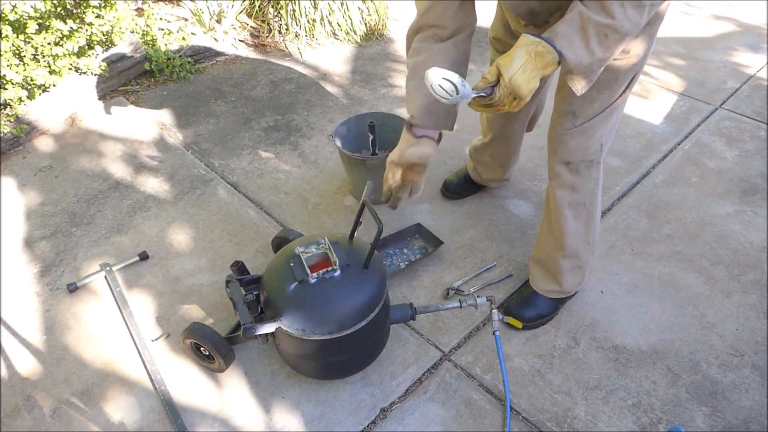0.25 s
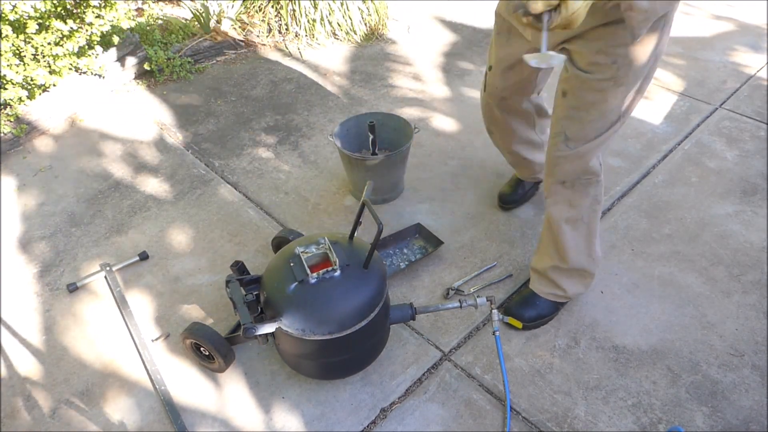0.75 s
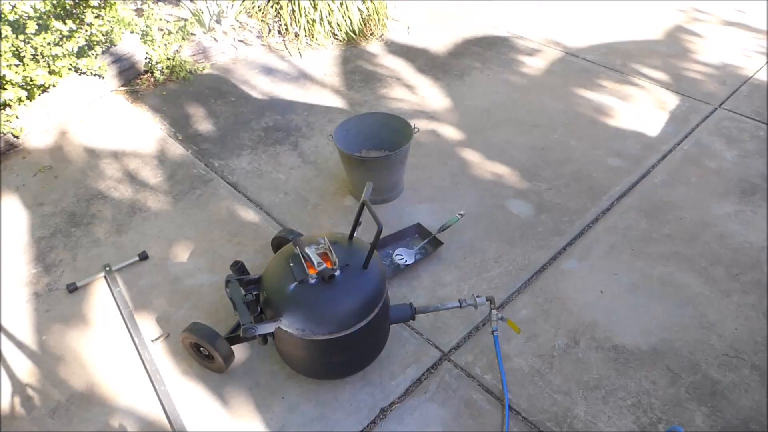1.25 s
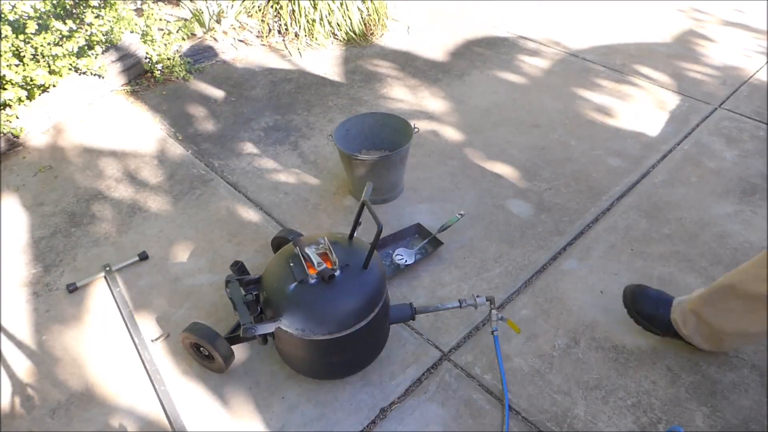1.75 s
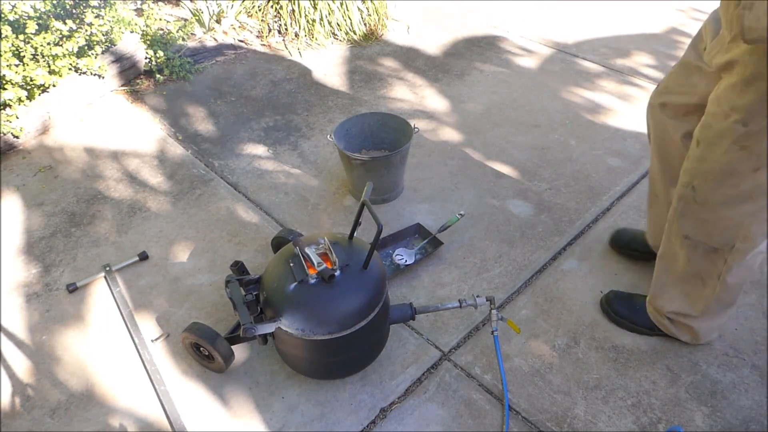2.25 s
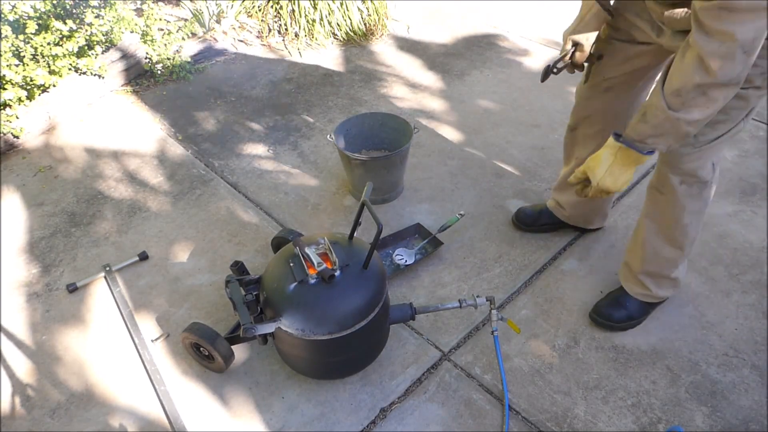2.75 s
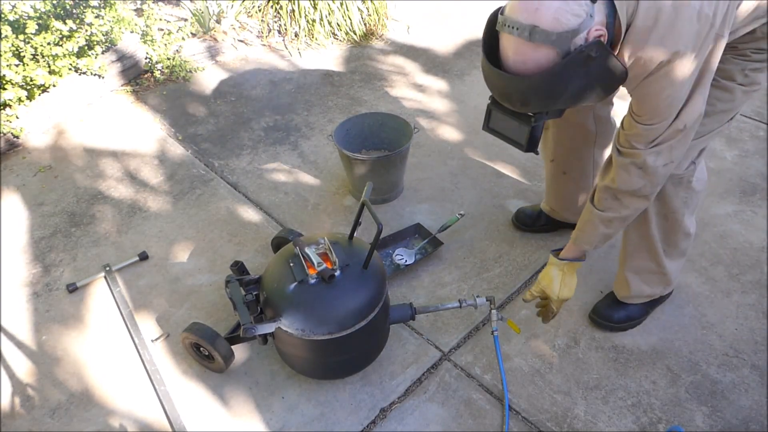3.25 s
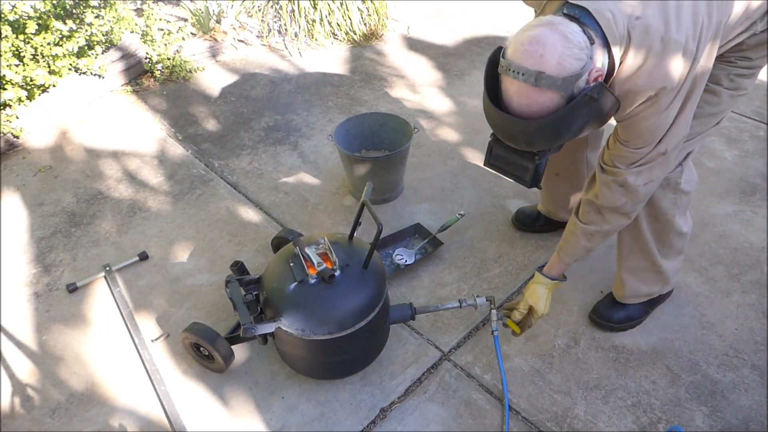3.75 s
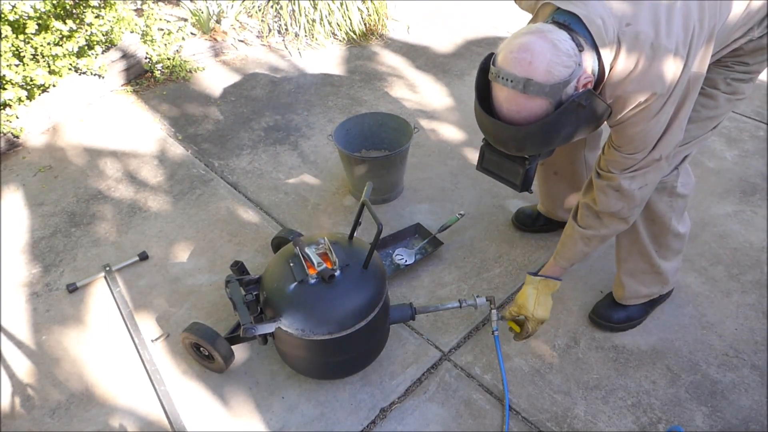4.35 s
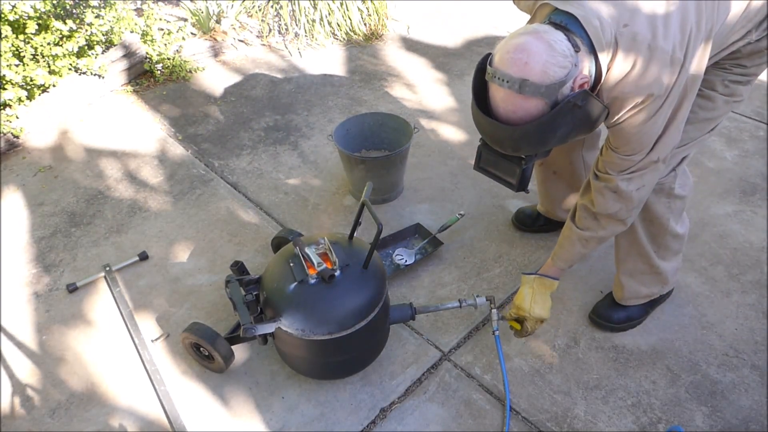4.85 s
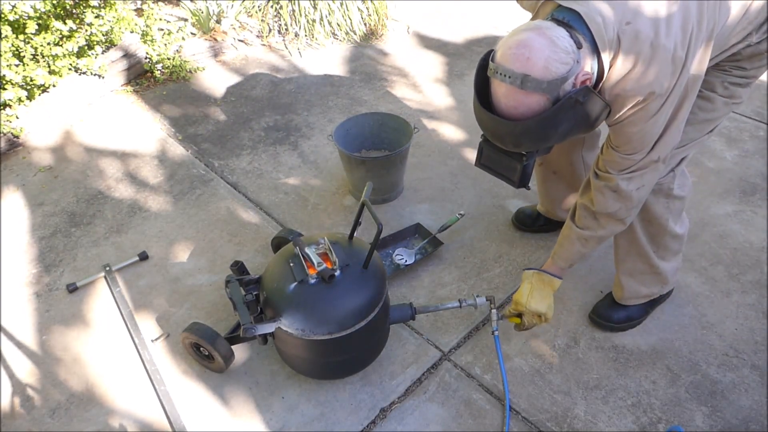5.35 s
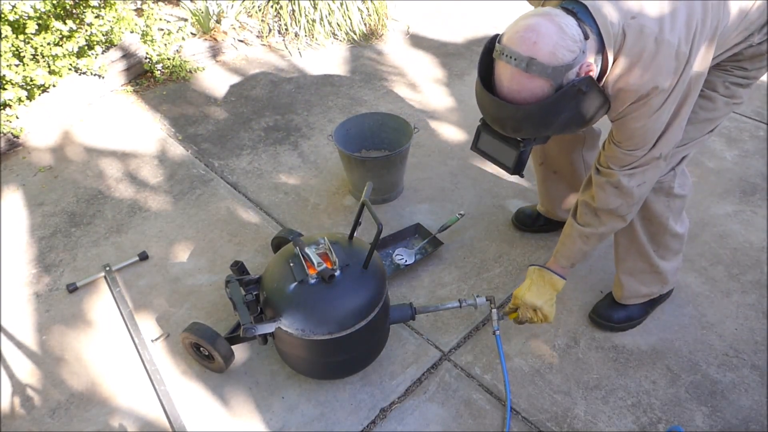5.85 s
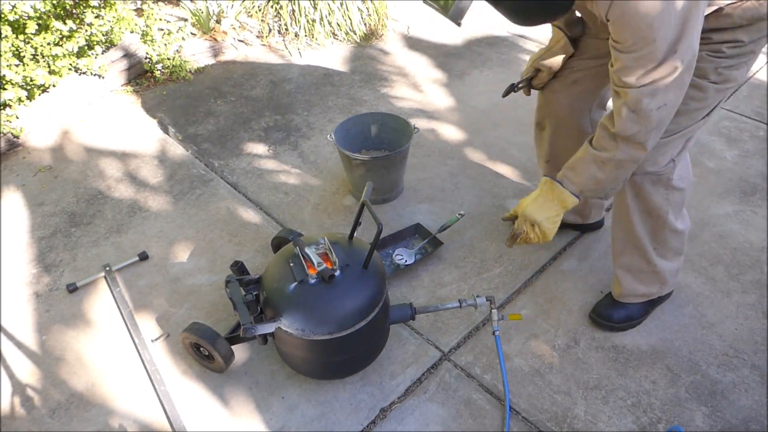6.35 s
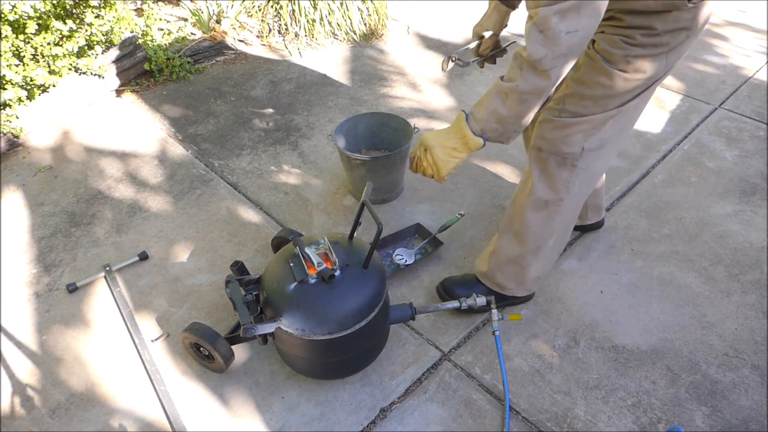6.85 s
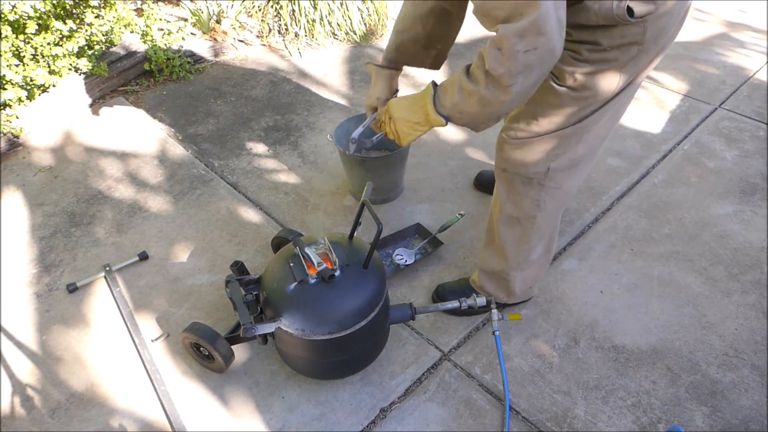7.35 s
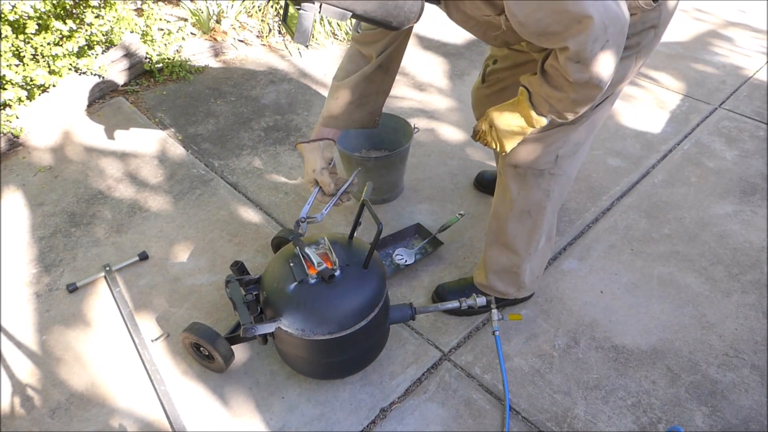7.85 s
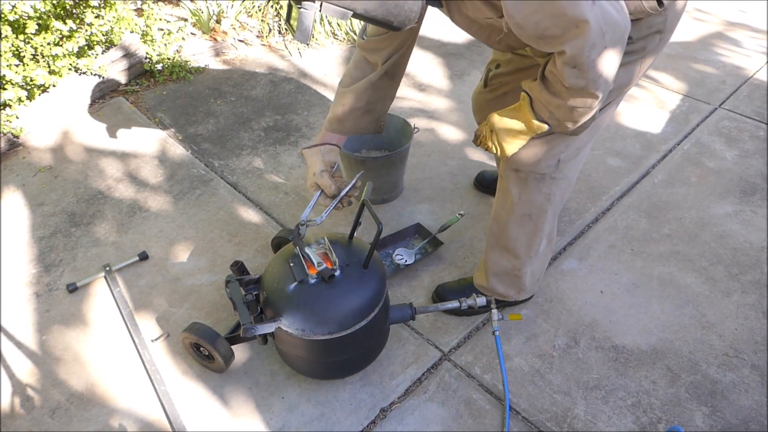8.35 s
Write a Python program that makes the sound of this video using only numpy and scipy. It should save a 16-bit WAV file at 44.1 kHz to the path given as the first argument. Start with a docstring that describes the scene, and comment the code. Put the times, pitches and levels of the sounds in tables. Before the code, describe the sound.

In an outdoor yard, a nearby gas furnace burns with a deep, even roar, a ringing tube tone and a bright hiss, broken once by a split-second dropout. Past the middle the flame fades out as the valve closes, uncovering soft leaf rustle, far traffic and a faint raspy, birdlike squeal. Several boot steps cross the concrete among very faint whistles, and steel tongs give two bright clinks at the end.

```python
"""Gas furnace in a concrete yard

A gas burner roars into a small steel furnace: the chamber booms, the tube rings, the jet hisses.
The sound drops out once, then the valve is shut. A rough, distant squeal echoes, perhaps a bird.
Boots knock on the slabs, tongs tick and clink, and faint whistles pass over far traffic and leaves."""
import sys
import numpy as np
from scipy import signal
from scipy.fft import rfft, irfft, next_fast_len
from scipy.io import wavfile
from scipy.ndimage import uniform_filter1d, map_coordinates

SR = 44100
rng = np.random.default_rng(int(sys.argv[2]) if len(sys.argv) > 2 else 0)


def transcribe(u):
    """Save the signal u as a 16-bit wav file named by the first command-line argument.

    u: samples, shape (n,) or (channels, n), limited to [-1, 1]; the rate is SR.
    q: integer samples, one column per channel.
    """
    v = np.clip(np.atleast_2d(u).T, -1, 1)
    q = np.round(v * 32767).astype(np.int16)
    wavfile.write(sys.argv[1], SR, q)


N = 379260
T = np.arange(N) / SR
GRID_HZ = np.arange(0, SR / 2, 3.0)
SHUT_S, OUT_S = 5.326, 5.9  # the valve starts to close; the flame is out

# The dropout that splits the burn in two: start_s, end_s
GAP = (1.2805, 1.3705)
# Resonances of chamber, burner tube and gas jet: pitch_hz, width_hz, before_gap_db, after_gap_db
CHAMBER_MODES = [(85, 14, -25, -28), (137, 21, -12, -12.5), (168, 41, -3.5, -6.5), (214.7, 39.4, 1.5, -1),
                 (288.2, 29.4, -5.5, -1), (333.5, 44, -3.5, 2), (391, 84, -8.5, -5.5),
                 (462.7, 50, -10.5, -10), (543, 51, -14.5, -14), (618.6, 65, -19, -17)]
TUBE_MODES = [(791, 54, 0, -4), (978, 63, -8, -11), (1162, 77, -5, -11), (1395, 60, 3, -1),
              (1463, 42, 1, 0), (1543, 41, -1.5, -1.5), (1732, 59, -2, -4.5), (1950, 120, -6, -9),
              (2100, 56, -1, -9), (2317, 240, -12.5, -11.5), (2510, 42, -8.5, -10), (2583, 50, -1.5, -1.5),
              (2770, 61, -4, -5.5), (2957, 136, -8, -11), (3176, 70, -12.5, -13), (3324, 90, -9.5, -15.5)]
JET_MODES = [(3805, 470, 0.5, 0.5), (4400, 520, -0.5, -0.5), (5300, 500, -8, -8.5), (5960, 570, -6, -3.5),
             (6520, 55, -5, -1), (6687, 126, -0.5, 1.5), (7190, 220, -8, -9), (7840, 220, -9, -7.5),
             (8440, 120, -7, -6.5), (8730, 200, -13, -11.5), (9300, 500, -17, -17), (10000, 540, -7, -5.5),
             (10970, 740, -9.5, -8), (11730, 350, -8, -6.5)]
# Faders for chamber, tube and jet; the loss is reached 0.1 s into the closing:
# before_gap_db, after_gap_db, creep_db_per_s, loss_db, fade_exponent
FLAME_FADERS = [(-18.5, -18, 0, 10, 1.13), (-32, -33, 0, 7, 1.75), (-42.5, -36.5, 0.42, 15.5, 1.23)]
# Brief swells and dips, a list each for chamber, tube and jet: centre_s, width_s, gain_db
FLAME_SWINGS = [
    [(.19, 0.046, -5), (5.31, .04, 2)],
    [(3.1, 0.36, -1.5)],
    [(.7, .04, 3), (.82, .04, 2.5)],
]
# Stereo image of the burner's direct sound: frequency_hz, correlation
BURNER_IMAGE = [(60, 0.47), (130, 1), (500, 0.98), (1200, 0.99), (2600, 0.96), (5500, 0.94), (11700, 0.57)]
# Balance of tube and jet: frequency_hz, left_minus_right_db
BURNER_BALANCE = [(60, 0), (170, -2), (500, 1), (1420, 0.5), (4080, -1), (11700, 1.5)]
# Faders for the background bed: time_s, traffic_db, leaves_db
AIR_FADERS = [(5.8, -51.5, -59), (5.99, -54, -60.5), (6.14, -53, -56.5), (6.83, -50, -56), (7.2, -51, -58),
              (7.6, -51.5, -53.5), (7.88, -54.5, -59), (8.09, -55, -61), (8.45, -52.5, -61.5),
              (8.6, -49, -60)]
# Tone curves of traffic and leaves: frequency_hz, gain_db
TRAFFIC_EQ = [(15, -54), (25, -22), (101, -15), (133, -5), (368, -11), (419, -10), (551, -13), (897, -18.5),
              (1200, -21.5), (1560, -56), (2640, -120)]
LEAVES_EQ = [(470, -25), (800, -6), (906, -9), (1110, -7), (1940, -9.5), (2190, -10.5), (3120, -13),
             (4090, -16), (6080, -16), (7460, -19.5), (11000, -17), (12100, -21.5), (22000, -120)]
# Stereo image of the bed: frequency_hz, correlation
AIR_IMAGE = [(60, -0.41), (220, -0.12), (840, -0.26), (3140, 0.32), (11700, 0.29)]
# Dry ticks: start_s, level_db, centre_hz, t60_s
TICKS = [(.121, -19, 4100, 0.051), (0.143, -30, 3500, 0.053), (.161, -46, 4500, .03),
         (.171, -36, 4000, 0.021), (5.708, -50, 1490, .06), (5.84, -38, 100, 0.11),
         (6.061, -41.5, 2300, 0.032), (6.077, -51, 2400, .03), (6.59, -55, 2000, 0.11)]
# Decay of the yard's reverb: frequency_hz, t60_s
YARD_DECAY = [(200, 0.26), (2000, 0.24), (10000, 0.22)]
# The distant squeal's two gliding voices, a list each: time_s, pitch_hz, level_db, roughness (0-1)
SQUEALS = [
    [(5.625, 3220, -56.5, 0.3), (5.68, 2930, -48, .5), (5.72, 3024, -51, .8), (5.79, 3550, -51, .7),
     (5.83, 4060, -55, .2), (5.93, 4086, -66, 0.2), (6.07, 4100, -67, .1)],
    [(5.68, 3530, -62, .8), (5.76, 3400, -57, 0.58), (5.85, 3490, -55, 0.8), (5.99, 3530, -68, .9)],
]
# The octave above each voice: peak_gain_db, peak_s, width_s
SQUEAL_OCTAVES = [(-26, 5.75, .3), (-3.5, 5.74, 0.064)]
# Footsteps: start_s, level_db, scuff_gain_db, left_minus_right_db
STEPS = [(6.333, -49, -23, -1.0), (6.719, -42, -16, -3), (6.976, -31, -23, -1), (7.063, -37, -20, 0.0),
         (7.31, -44.5, -24, -3), (7.454, -20, -25.5, -1), (7.581, -43, -26, 4.0), (7.888, -56, -15, 2.5)]
# Modes of a slab under a boot: pitch_hz, gain_db, t60_s
SLAB_MODES = [(253, -2.5, 0.035), (408, 4, 0.034), (550, 2, 0.041), (672, 6, 0.028), (830, -10, 0.02),
              (1150, -13, 0.023)]
# Faint whistles: start_s, end_s, start_hz, end_hz, level_db, flutter_hz, left_minus_right_db
WHISTLES = [(6.445, 6.92, 647, 623, -62.5, 59, 0), (6.704, 7.0, 1100, 1100, -61, 110, 0),
            (6.77, 6.96, 2900, 2890, -69, 40, 0), (7.12, 7.423, 185, 180.4, -56.5, 18, -2),
            (7.2, 7.268, 2720, 2700, -64, 40, 2), (7.238, 7.413, 2570, 2430, -65, 270, 0),
            (7.97, 8.08, 3200, 3220, -75, 96, -6)]
# Tongs hitting steel: start_s, level_db, crack_gain_db, shell_gain_db, left_minus_right_db
CLINKS = [(8.4015, -35, -6.5, -3, 2.5), (8.575, -22, -18.5, -17, 2.5)]
# Modes of the tongs: pitch_hz, gain_db, t60_s
TONG_MODES = [(1350, -8, .05), (2340, -7, .04), (4810, -7, .22), (4870, -5.5, 0.18), (4970, 2.5, .04),
              (9800, -21, .04)]

HIT_T = np.arange(SR // 2) / SR  # seconds since a hit


def amp(db):
    """Decibels to gain."""
    return 10 ** (np.asarray(db) / 20)


def unit(x):
    """Scale to rms 1."""
    return x / np.sqrt(np.mean(x ** 2) + 1e-20)


def along(points, hz):
    """Read a curve of (frequency_hz, value) points on a log axis."""
    f, values = np.transpose(points)
    return np.interp(np.log(hz + 1), np.log(f + 1), values)


def automation(rows):
    """One value per sample for each column after the time."""
    times, *columns = np.transpose(rows)
    return [np.interp(T, times, column) for column in columns]


def wobble(rate_hz, count=N):
    """A smooth random curve with rate_hz knots a second."""
    knots = rng.standard_normal(int(count * rate_hz / SR) + 4)
    return map_coordinates(knots, [T[:count] * rate_hz], order=2)


def filtered(x, response):
    """EQ x with a gain that is a function of frequency."""
    size = next_fast_len(x.shape[-1] + 8192)
    return irfft(rfft(x, size) * response(np.fft.rfftfreq(size, 1 / SR)), size)[..., :x.shape[-1]]


def pan(db):
    """Left and right gains, db apart."""
    return amp([[db / 2], [-db / 2]])


def add(into, start_s, sound):
    """Mix in a stereo sound at start_s."""
    part = into[:, round(start_s * SR):][:, :sound.shape[1]]
    part += sound[:, :part.shape[1]]


def rush(gain, correlation, patchy_db, span_s=(0, N / SR)):
    """Stereo noise of rms 1 inside span_s, mottled in time and frequency by random gains."""
    first, last = (min(round(s * SR), N) for s in span_s)
    spectrum = signal.stft(rng.standard_normal((2, last - first)), nperseg=512)[2]
    patches = uniform_filter1d(rng.standard_normal(spectrum.shape[1:]), size=5, axis=0)
    patches = unit(uniform_filter1d(patches, size=12, axis=1))
    pair = signal.istft(spectrum * amp(patchy_db * patches), nperseg=512)[1][:, :last - first]
    angle = lambda f: np.arccos(np.clip(correlation(f), -1, 1)) / 2
    mid, side = filtered(pair, lambda f: gain(f) * np.array([np.cos(angle(f)), np.sin(angle(f))]))
    return np.pad(unit(np.array([mid + side, mid - side])), ((0, 0), (first, N - last)))


def burst(db, t60_s, attack_s, centre_hz, q):
    """A hit of band-passed noise that dies away."""
    bandpass = lambda f: 1 / (1 + (q * (f / centre_hz - centre_hz / (f + 1))) ** 2)
    noise = unit(filtered(rng.standard_normal(len(HIT_T)), bandpass))
    return amp(db - 60 * HIT_T / t60_s) * (1 - np.exp(-HIT_T / attack_s)) * noise


def ring(modes, attack_s):
    """Struck modes, balanced a little differently on every hit."""
    partials = sum(amp(db + rng.normal(0, 0.95) - 60 * HIT_T / t60_s) * np.sin(2 * np.pi * hz * HIT_T)
                   for hz, db, t60_s in modes)
    return partials * (1 - np.exp(-HIT_T / attack_s))


def mode_power(modes, column, skirt, widen=1):
    """Power spectrum of independently driven resonances; a higher skirt steepens their sides."""
    return sum(amp(2 * m[column]) / widen / (1 + (2 * (GRID_HZ - m[0]) / (widen * m[1])) ** 2) ** skirt
               for m in modes)


def resonant_noise(modes, skirt, scatter_db, patchy_db):
    """Noise through resonances; scatter from the yard fills the valleys and widens the image."""
    out = 0
    for column, span_s in ((2, (0, GAP[0])), (3, (GAP[0], OUT_S))):
        direct = mode_power(modes, column, skirt)
        total = direct + amp(2 * scatter_db) * mode_power(modes, column, skirt, widen=4.2)
        correlation = along(BURNER_IMAGE, GRID_HZ) * direct / total
        out = out + rush(lambda f: np.interp(f, GRID_HZ, np.sqrt(total)),
                         lambda f: np.interp(f, GRID_HZ, correlation), patchy_db, span_s)
    return out


def flame_levels():
    """Chamber, tube and jet in dB: a steady burn, then each fades its own way as the valve closes."""
    closing = np.clip(T - SHUT_S, 0, None) * 10
    for (before_db, after_db, creep, loss_db, exponent), swings in zip(FLAME_FADERS, FLAME_SWINGS):
        burn_db = np.where(T < GAP[1], before_db, after_db + creep * (T - GAP[1]))
        swing_db = sum(db * np.exp(-((T - s) / width_s) ** 2) for s, width_s, db in swings)
        yield burn_db - loss_db * closing ** exponent + swing_db


def early_reflections(x, count, db):
    """Weak slaps off the walls, different on each side, comb the spectrum finely."""
    impulse = np.zeros((2, SR // 20))
    impulse[:, 0] = 1
    delays = (rng.uniform(0.001996, .018, (2, count)) * SR).astype(int)
    np.put_along_axis(impulse, delays, amp(db) * rng.standard_normal((2, count)), axis=1)
    return signal.oaconvolve(x, impulse, axes=1)[:, :N]


def burner():
    """Turbulent burning drives the chamber and tube; the jet hisses at the nozzle."""
    chamber_db, tube_db, jet_db = flame_levels()
    roar = resonant_noise(CHAMBER_MODES, skirt=1.86, scatter_db=-19.5, patchy_db=.5)
    roar = filtered(roar, lambda f: 1 / (1 + (70 / (f + 1)) ** 2.8))  # a low cut thins the deepest bass
    dull = filtered(roar, lambda f: 2.2 / (1 + (f / 300) ** 5.1))  # a starved flame keeps its low modes
    starved = np.clip((-21.0 - chamber_db) / 14, 0, 1) * (T > SHUT_S)
    roar = (1 - starved) * roar + starved * dull
    roar *= amp(chamber_db + 0.63 * wobble(60) + 0.42 * wobble(9))
    tube_gain = amp(tube_db + 0.55 * wobble(7.6))
    tube = tube_gain * resonant_noise(TUBE_MODES, skirt=1.27, scatter_db=-6.5, patchy_db=0.9)
    jet_gain = amp(jet_db + 0.25 * wobble(11))
    jet = jet_gain * resonant_noise(JET_MODES, skirt=1.47, scatter_db=-4.0, patchy_db=1.27)
    flutter = rush(lambda f: 1 / (1 + (f / 80) ** 3.5), np.zeros_like, patchy_db=1.0, span_s=(0, OUT_S))
    flutter *= amp(chamber_db - 38.5)  # wide bass, tucked under the roar
    highs = filtered(tube + jet, lambda f: amp(along(BURNER_BALANCE, f) * np.array([[.5], [-.5]])))
    return roar + early_reflections(highs, count=12, db=-19.0) + flutter


def yard_air():
    """A bed of distant traffic rumble and leaf rustle."""
    traffic_db, leaves_db = automation(AIR_FADERS)
    image = lambda f: along(AIR_IMAGE, f)
    traffic = rush(lambda f: amp(along(TRAFFIC_EQ, f)), image, patchy_db=1.0)
    leaves = rush(lambda f: amp(along(LEAVES_EQ, f)), image, patchy_db=1.5)
    return amp(traffic_db + 0.53 * wobble(8)) * traffic + amp(leaves_db + 0.33 * wobble(9.6)) * leaves


def ticks():
    """Dry ticks: short, narrow bursts of noise, dead centre."""
    out = np.zeros((2, N))
    for start_s, db, hz, t60_s in TICKS:
        add(out, start_s, burst(db, t60_s, attack_s=1 / hz, centre_hz=hz, q=2.24) * pan(0))
    return out


def yard_reverb(x):
    """House walls answer with a short tail; each frequency dies at its own speed."""
    hz, t, spectrum = signal.stft(rng.standard_normal((2, SR // 2)), SR, nperseg=256)
    tail = signal.istft(spectrum * amp(-60 * t / along(YARD_DECAY, hz)[:, None]), SR, nperseg=256)[1]
    predelayed = np.pad(x, ((0, 0), (300, 0)))
    return signal.fftconvolve(predelayed, tail / np.linalg.norm(tail[0]), axes=1)[:, :N]


def distant_squeal():
    """Two gliding voices, perhaps a bird; a fast, random rasp smears each tone into a band."""
    out = np.zeros((2, N))
    for rows, (peak_db, peak_s, width_s) in zip(SQUEALS, SQUEAL_OCTAVES):
        start_s, end_s = rows[0][0], rows[-1][0]
        on = (T > start_s) & (T < end_s)
        hz, db, rough = (curve[on] for curve in automation(rows))
        n = len(hz)
        octave_db = peak_db - 10 * ((T[on] - peak_s) / width_s) ** 2
        phase = 2 * np.pi * np.cumsum(hz * (1 + 0.012 * rough * wobble(149, n))) / SR
        rasp = np.sqrt(1 - rough) * amp(2.0 * wobble(49, n)) + np.sqrt(rough) * wobble(600, n)
        tone = rasp * np.sin(phase) + amp(octave_db) * wobble(300, n) * np.sin(2 * phase)
        add(out, start_s, amp(db) * signal.windows.tukey(n, .04) * np.sqrt(2) * tone * pan(1.9))
    return out


def boots():
    """Each sole scuffs the grit, knocks the slab, then settles in ever softer, slower taps."""
    out = np.zeros((2, N))
    land_s, first_wait_s, wait_growth, tap_loss_db = .0015, .0063, 1.24, 4.5
    for start_s, db, scuff_db, side_db in STEPS:
        scuff = burst(db + scuff_db, t60_s=0.21, attack_s=0.0044, centre_hz=2300, q=0.35)
        add(out, start_s, scuff * pan(side_db))
        for tap in range(7):
            delay_s = land_s + first_wait_s * (wait_growth ** tap - 1) / (wait_growth - 1)
            knock = amp(db - tap_loss_db * tap) * ring(SLAB_MODES, attack_s=0.0025)
            add(out, start_s + delay_s, knock * pan(side_db))
    return out


def whistles():
    """Thin fluttering tones, blurred by narrow noise, that swell and fade."""
    out = np.zeros((2, N))
    for start_s, end_s, start_hz, end_hz, db, flutter_hz, side_db in WHISTLES:
        n = round((end_s - start_s) * SR)
        progress = np.linspace(0, 1, n)
        phase = 2 * np.pi * np.cumsum(start_hz + (end_hz - start_hz) * progress) / SR
        tone = (1.23 + wobble(flutter_hz, n)) * np.sin(phase) + wobble(flutter_hz, n) * np.cos(phase)
        swell = np.abs(np.sin(np.pi * progress)) ** 0.27
        add(out, start_s, amp(db) * swell * tone * pan(side_db))
    return out


def tong_clinks():
    """Tongs strike steel: a bright crack, a shivering ring and the dull rattle of the lined shell."""
    out = np.zeros((2, N))
    for start_s, db, crack_db, shell_db, side_db in CLINKS:
        crack = burst(crack_db, t60_s=0.079, attack_s=.0006, centre_hz=5100, q=0.13)
        shell = burst(shell_db, t60_s=0.25, attack_s=0.012, centre_hz=440, q=0.41)
        tongs = amp(-9.5 + 3.7 * wobble(120, len(HIT_T))) * ring(TONG_MODES, attack_s=.0008)
        add(out, start_s, amp(db) * (tongs + crack + shell) * pan(side_db))
    return out


def scene():
    """The full mix, with the hits and the squeal sent to the yard reverb."""
    hits = boots() + ticks() + tong_clinks()
    squeal = distant_squeal()
    send = amp(-7.5) * hits + amp(-2.0) * squeal
    return burner() + yard_air() + whistles() + hits + squeal + yard_reverb(send)


def record(dry):
    """Mute the mix during the gap and cut off the top end."""
    unmuted = (T < GAP[0]) | (T > GAP[1])
    return filtered(dry * unmuted, lambda hz: hz < 12040)


dry = scene()
out = record(dry)
transcribe(out)
```